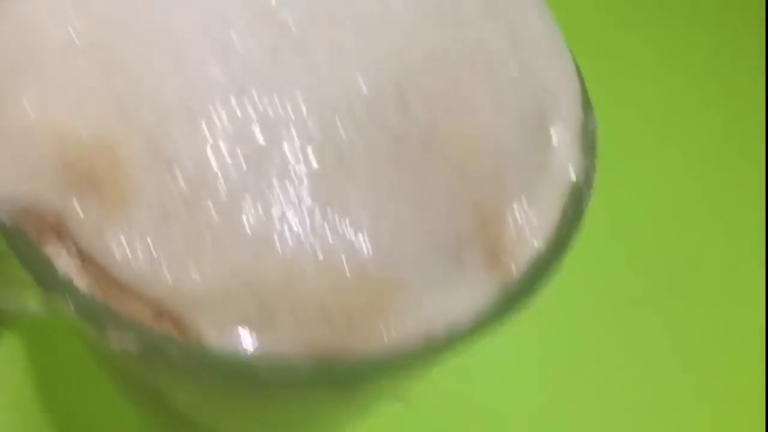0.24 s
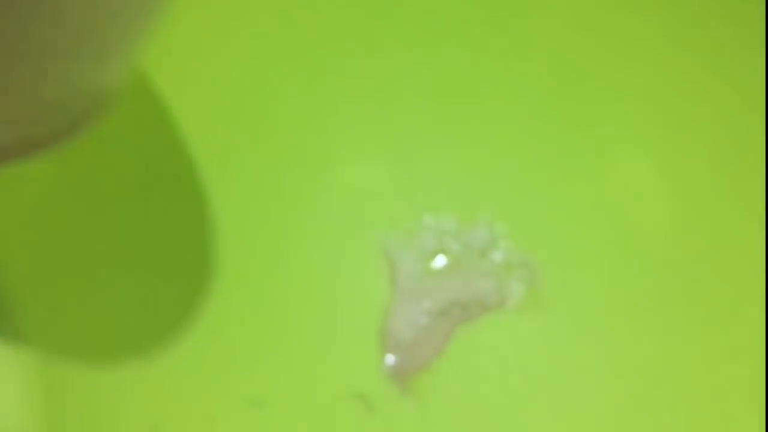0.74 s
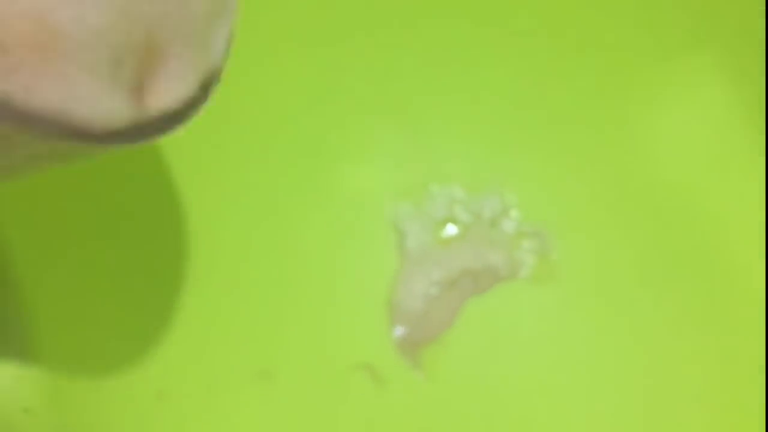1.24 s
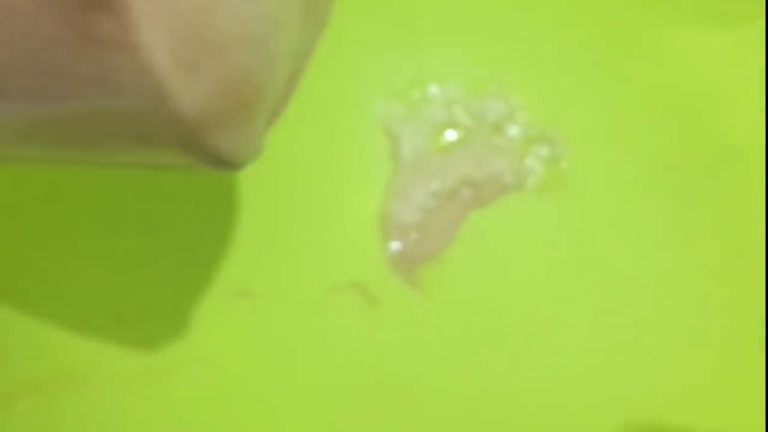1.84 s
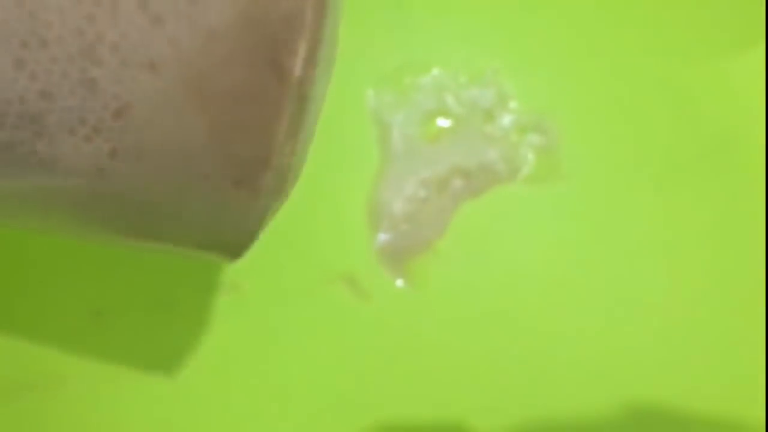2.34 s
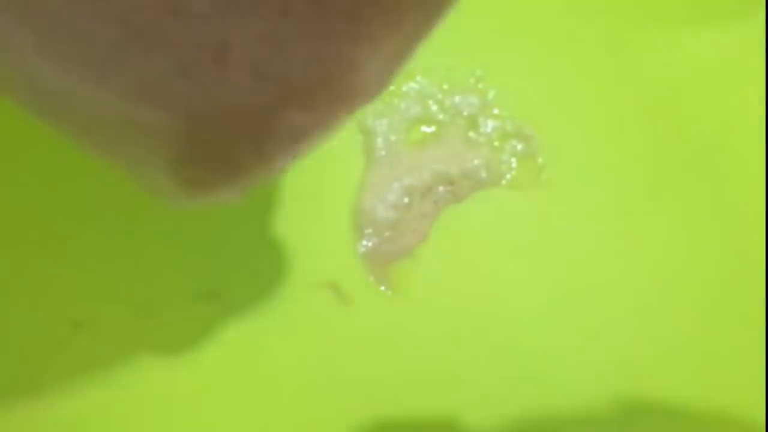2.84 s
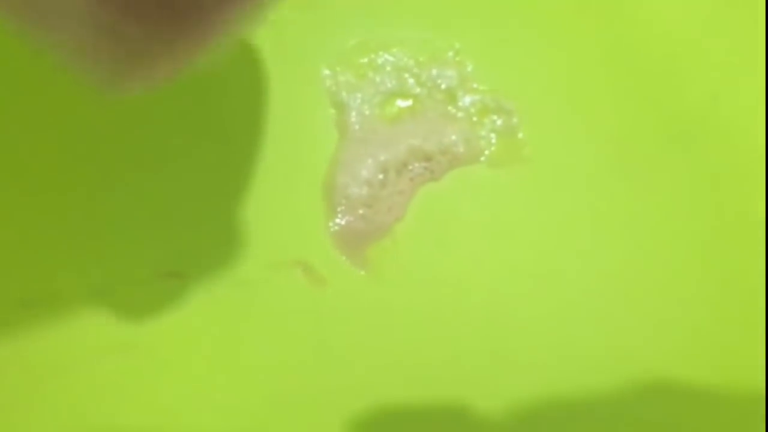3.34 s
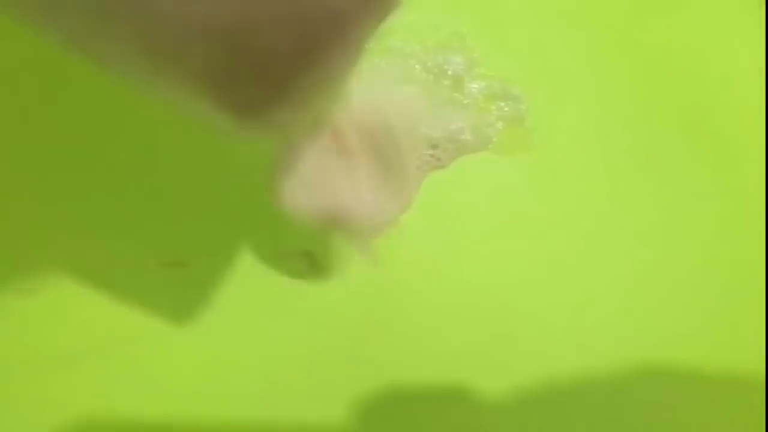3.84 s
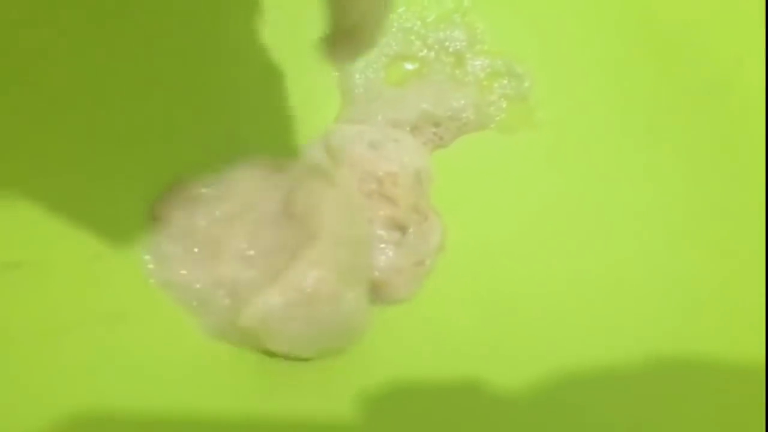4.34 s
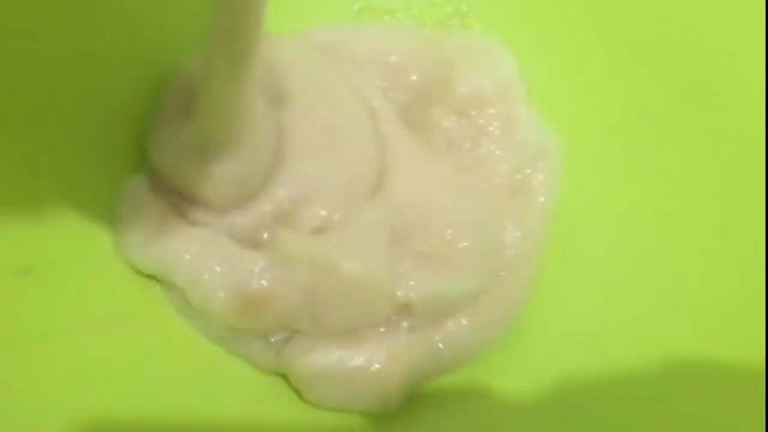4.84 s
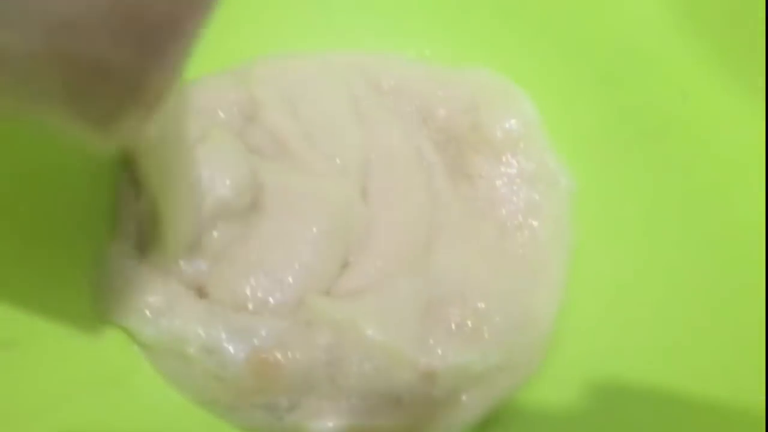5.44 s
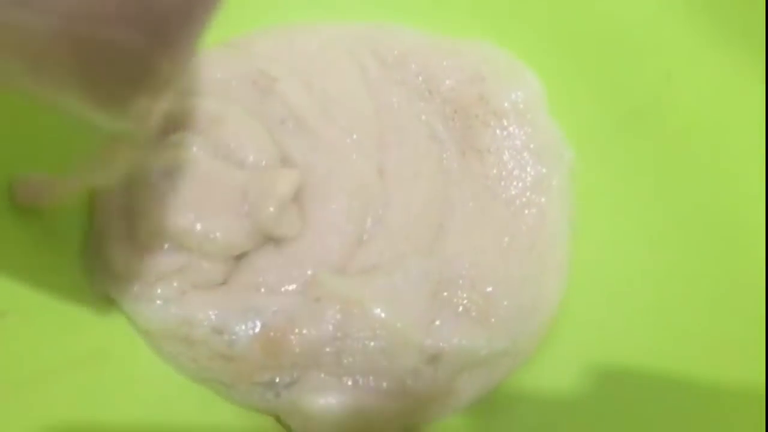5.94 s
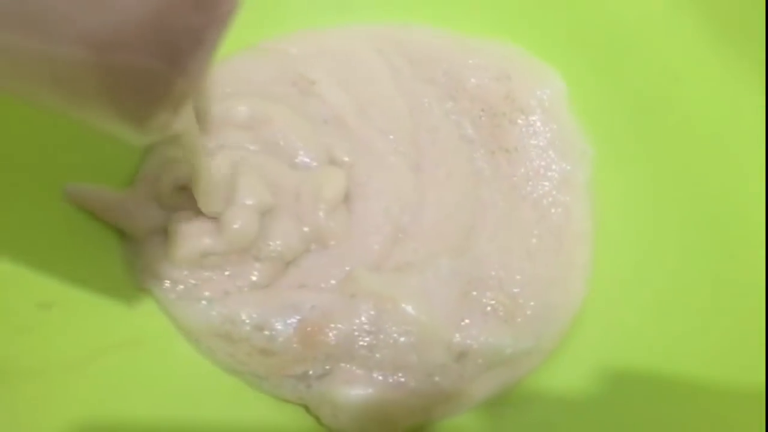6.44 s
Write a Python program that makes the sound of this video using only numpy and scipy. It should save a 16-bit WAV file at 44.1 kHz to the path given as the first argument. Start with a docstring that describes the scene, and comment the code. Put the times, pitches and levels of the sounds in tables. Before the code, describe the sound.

Over a low refrigerator hum, a glass knocks a plastic bowl, ticks in creaky slips, then thick frothy batter plops out wetly.

```python
"""A small kitchen, one microphone: a glass of frothy batter is knocked, tipped and emptied into a bowl.
Room rumble is shaped noise; a refrigerator motor hums in sines. The knock rings a plastic bowl and counter.
Slips tick along the glass as noise cracks and ringing modes, and fingers hiss on it.
Blobs splat in noise bursts, trapped air pops in short sines, and froth rustles in flickering noise bands."""
import sys
import numpy as np
from scipy import signal
from scipy.fft import rfft, irfft, next_fast_len
from scipy.io import wavfile
from scipy.ndimage import map_coordinates

SR = 44100
rng = np.random.default_rng(int(sys.argv[2]) if len(sys.argv) > 2 else 0)


def to_wav(sig):
    """Store sig (one row per channel, or 1-D mono) as 16-bit WAV at the path in sys.argv[1].

    Samples outside -1..1 are clipped; the rate is SR.
    """
    pcm = np.clip(np.atleast_2d(sig), -1, 1) * 32767
    pcm = np.round(pcm).astype(np.int16)
    wavfile.write(sys.argv[1], SR, pcm.T)  # frames by channels


def boost_factor(decibels):
    """Convert a level in decibels to a linear amplitude factor."""
    exponent = np.asarray(decibels, float) / 20
    return 10 ** exponent


N = 294357   # samples


def rms_one(x):
    """Scale to rms 1."""
    return x / np.sqrt(np.mean(x ** 2) + 1e-20)


def in_time(rows, outside=None):
    """Curve columns at every sample."""
    s, *columns = np.transpose(rows)
    return [np.interp(np.arange(N) / SR, s, c, outside, outside) for c in columns]


def drift(rate):
    """Smooth random curve of spread about 1, through `rate` random knots per second."""
    knots = rng.standard_normal(1000)
    return map_coordinates(knots, [np.arange(N) / SR * rate + 2], order=3)


def band(x, low_hz, high_hz):
    """Band-pass."""
    return signal.sosfilt(signal.butter(2, [low_hz, min(high_hz, .45 * SR)], "band", fs=SR, output="sos"), x)


def ring(clicks, hz, t60):
    """A unit click sets a sine of starting height 1 ringing; it falls 60 dB in t60 seconds."""
    r, w = boost_factor(-60 / (t60 * SR)), 2 * np.pi * hz / SR
    return signal.lfilter([0, np.sin(w)], [1, -2 * r * np.cos(w), r * r], clicks + 1e-18)


def resonance(x, hz, width_hz):
    """Two-pole resonance, gain 1 on top."""
    r = np.exp(-np.pi * width_hz / SR)
    poles = [1, -2 * r * np.cos(2 * np.pi * hz / SR), r * r]
    return signal.lfilter([(1 - r * r) / 2, 0, (r * r - 1) / 2], poles, x)


def clicks_at(seconds, db):
    """Impulses at the given times."""
    out = np.zeros(N)
    out[np.round(np.asarray(seconds) * SR).astype(int)] = boost_factor(np.asarray(db))
    return out


def half_octaves(grain_db):
    """Grainy noise in half-octave bands from 500 Hz up, and the centres of the bands."""
    grains = rng.standard_normal((2, N)) * boost_factor(grain_db * np.minimum(rng.exponential(1, N), 5))
    lows = 500 * np.sqrt(2) ** np.arange(10)
    bands = [rms_one(band(grains[k % 2], low, np.sqrt(2) * low)) for k, low in enumerate(lows)]
    return np.array(bands), lows * 2 ** .25


def blend(bands, db):
    """Bands weighted in dB, summed to about rms 1."""
    gain = boost_factor(db)
    return np.sum(bands * gain, axis=0) / np.sqrt(np.sum(gain ** 2, axis=0))


def rustle(grains, level_db, tilt_db, shared_db, patchy_db):
    """Fine grains in patches: all bands flicker together, and each swells on its own."""
    bands, hz = grains
    shared = drift(60.0)
    flicker_db = np.array([shared_db * shared + patchy_db * drift(28.0) for _ in hz])
    weight_db = np.log2(hz / 3000)[:, None] * np.clip(tilt_db, -9, 9)   # tilt in dB per octave
    return boost_factor(level_db) * blend(bands * boost_factor(flicker_db), weight_db)


# Room rumble and microphone hiss: (frequency [Hz], relative density [dB per Hz])
ROOM_SPECTRUM = [(22, -49), (36, -8.5), (45, -4.5), (110, -11.5), (180, -7.5), (260, -13.5), (400, -21.5),
                 (520, -30), (800, -32.5), (1000, -27.5), (1300, -34.5), (2500, -43), (5000, -48.5),
                 (7000, -51), (11500, -49.5)]
# Standing waves of the room: (frequency [Hz], width [Hz], lift [dB])
ROOM_MODES = [(69.3, 3.2, 13.5), (92.4, 33, 3.5), (149.4, 6.6, 8.5), (184, 2.7, 3.5), (235, 6.2, 8.5),
              (282, 8.5, 2)]


def room_tone():
    """Noise coloured by the rumble spectrum and the standing waves."""
    size = next_fast_len(N)
    hz = np.maximum(np.arange(size // 2 + 1) * SR / size, 1)
    table_hz, table_db = np.transpose(ROOM_SPECTRUM)
    db = np.interp(np.log(hz), np.log(table_hz), table_db)
    for centre_hz, width_hz, lift_db in ROOM_MODES:
        db += lift_db / (1 + (2 * (hz - centre_hz) / width_hz) ** 2)
    noise = irfft(rfft(rng.standard_normal(size)) * boost_factor(db), size)[:N]
    return boost_factor(-48) * rms_one(noise)


# Refrigerator motor tones: (multiple of the shaft rate, level before waver and swell [dB])
MOTOR_TONES = [(1, -65), (3, -62), (4, -50.5), (19, -78.5), (20, -77.5), (21, -85), (22, -74), (23, -79)]


def motor(buzz_db):
    """Steady multiples of the shaft rate; the high ones buzz in the casing and waver more."""
    shaft_hz = 47.65 * (1 + 0.00047 * drift(1.462))
    turn = 2 * np.pi * np.cumsum(shaft_hz) / SR
    out = np.zeros(N)
    for multiple, level_db in np.array(MOTOR_TONES):
        order = np.round(multiple)
        waver_db = 1.1 * drift(4.17) + (order > 10) * (buzz_db + 0.74 * drift(2.75))
        out += np.sqrt(2) * boost_factor(level_db + waver_db) * np.sin(order * turn + rng.uniform(0, 2 * np.pi))
    return out


# Short cracks, one of the knocked rim, the others wet batter:
# (time [s], level [dB], length [s], centre [Hz], fall-off [dB per octave])
SPLATS = [(1.423, -46, 0.0026, 4500, 23), (4.036, -30.5, 0.0097, 1660, 1.5), (4.051, -30, 0.002, 9500, 7),
          (4.386, -58, 0.0028, 3500, -1), (4.6197, -24, 0.0039, 4230, 6), (5.114, -41.5, 0.0028, 2600, 11),
          (5.12, -56, 0.025, 3950, 26), (5.296, -46, 0.0042, 1500, 7), (5.399, -50.5, .005, 1300, 8)]


def splats(grains):
    """Dense crackle that starts at once and dies; the spread froth keeps cracking faintly at random."""
    bands, hz = grains
    out = np.zeros(N)
    faint = [(rng.uniform(5.45, 6.6), -63, .004, 7000, 9) for _ in range(6)]   # columns of SPLATS
    for s, level_db, length, centre_hz, fall_db in SPLATS + faint:
        t = np.arange(round(4 * length * SR)) / SR
        shape = np.minimum(t / 0.0014, 1) * np.exp(-(t / length) ** 1.34)
        at = slice(round(s * SR), round(s * SR) + len(t))
        weight_db = -fall_db * abs(np.log2(hz / centre_hz))[:, None]
        out[at] += boost_factor(level_db) * shape * blend(bands[:, at], weight_db)
    return out


# Plastic bowl: (frequency [Hz], level [dB], t60 [s])
BOWL_MODES = [(1110, -20, 0.017), (1310, -4, 0.016), (1550, 4, 0.013), (1750, -14.5, 0.012),
              (2100, -2.5, 0.014), (2440, 8.5, 0.0082), (2930, 5.5, 0.016), (4400, -30, 0.018),
              (5700, -18, 0.011), (6560, -30, 0.017)]
# Counter under the bowl: (frequency [Hz], level [dB], t60 [s])
COUNTER_MODES = [(82, -22, 0.11), (137, -16.5, 0.075)]


def knock():
    """The rim ticks first, then the glass lands on the bowl in a soft contact; the counter booms below."""
    knock_s, knock_db = 1.4266, -11
    contact = np.hanning(round(0.0006 * SR) + 2)
    rim = clicks_at([knock_s - .0006], knock_db - 24)
    landing = np.convolve(clicks_at([knock_s], knock_db), contact / contact.sum())[:N]
    blow = rim - landing
    shell = sum(ring(blow, hz, t60) * boost_factor(level_db) for hz, level_db, t60 in BOWL_MODES)
    # a small shell radiates no bass
    shell = signal.sosfilt(signal.cheby2(6, 40, 800, "high", fs=SR, output="sos"), shell)
    return shell + sum(ring(blow, hz, t60) * boost_factor(level_db) for hz, level_db, t60 in COUNTER_MODES)


def kitchen(x):
    """Diffuse tail: dull noise that sets in after the first walls and dies away."""
    t60_s = 0.26
    t = np.arange(round(.4 * SR)) / SR
    onset = np.clip(t / 0.0058 - .5, 0, 1)
    tail = band(rng.standard_normal(len(t)), 210, 3900) * boost_factor(-60 * t / t60_s) * onset
    return signal.fftconvolve(x, tail / np.sqrt(np.sum(tail ** 2)))[:N]


# Modes of the glass, also rung by the ticks: (frequency [Hz], level [dB], t60 [s])
GLASS_MODES = [(2095, -4, .032), (2305, -3, .048), (3370, -12, .02), (4565, -7, .034), (5550, -9, .034),
               (6470, -8, .036), (7380, -6, .03), (8990, -14, .022), (9450, -12, .022), (10800, -13, .022)]
# Fingers shift on the glass: (middle [s], half length [s], hiss [dB],
# brightness, held within 9 either way [dB per octave], singing of the upper modes [dB])
STROKES = [(2.057, .12, -67.5, -2, -85), (2.17, 0.038, -66.5, 5, -68), (2.26, 0.07, -82, 3, -78),
           (2.433, 0.062, -66.5, 7, -73), (2.653, 0.093, -63, -2, -80), (2.826, 0.078, -63, -12, -72)]


def slide(grains):
    """Skin hisses on the glass and keeps two thin upper modes singing; each stroke swells and fades."""
    middle, half, hiss_db, tilt_db, sing_db = np.transpose(STROKES)[:, :, None]
    fade_db = 16   # loss at one half length from the middle
    shape = boost_factor(-fade_db * np.minimum(((np.arange(N) / SR - middle) / half) ** 2, 12))
    hiss = boost_factor(hiss_db) * shape
    mean_tilt_db = np.sum(hiss * tilt_db, axis=0) / hiss.sum(axis=0)
    skin = rustle(grains, 0, mean_tilt_db, shared_db=3.5, patchy_db=1.5)
    friction = rng.standard_normal(N) * boost_factor(5 * drift(50))   # in patches
    upper = GLASS_MODES[6], GLASS_MODES[9]
    sing = sum(ring(friction, hz, t60) * boost_factor(level_db) for hz, level_db, t60 in upper)
    return hiss.sum(axis=0) * skin + np.sum(boost_factor(sing_db) * shape, axis=0) * rms_one(sing)


# Pops of trapped air: (time [s], peak level [dB], frequency [Hz], length [cycles])
POPS = [(2.0474, -21, 483, 2.4), (4.04, -51, 650, 4.2), (4.178, -45.5, 557, 5.8), (4.622, -37.5, 610, 8.7),
        (4.6221, -29, 1010, 3.6), (5.112, -39.5, 1750, 4), (5.299, -39.5, 1037, 8.2),
        (5.399, -47, 600, 8.2)]
# Heavy blobs push the floor of the bowl: (time [s], peak level [dB])
THUMPS = [(4.53, -36), (5.112, -43), (5.298, -37), (5.4, -34.5)]


def pops():
    """A pocket of air swells and dies within a few cycles, rising a little in pitch; thumps are low pops."""
    out = np.zeros(N)
    thumps = [(s, db, 308, 1.2) for s, db in THUMPS]   # Hz, cycles
    for s, peak_db, hz, cycles in POPS + thumps:
        t = np.arange(round(3 * cycles / hz * SR)) / SR
        age = t * hz / cycles * 2.86
        swell = (age * np.exp(1 - age)) ** 2
        tone = np.sin(2 * np.pi * hz * t * (1 + 0.0062 * age))
        out[round(s * SR):][:len(t)] += boost_factor(peak_db) * swell * tone
    return out


# Single slips on the glass: (time [s], crack level [dB], thud level [dB],
# favoured upper mode [Hz], favoured low mode [Hz])
SLIPS = [(2.0903, -50, -44, 3400, 2230), (2.2, -51, -50, 3400, 2300), (2.3665, -58, -53, 4500, 2300),
         (2.57, -56, -37, 7400, 2300), (2.6805, -42.5, -31.5, 4600, 2300), (2.7058, -43, -31, 6440, 2100),
         (2.7388, -41, -30.5, 7540, 2300), (2.7755, -38, -34, 6600, 2100), (2.804, -35, -26.5, 5700, 2100),
         (2.8579, -32, -28.5, 7460, 2300), (2.9637, -30, -32.5, 7400, 2100),
         (2.9853, -34, -27.5, 6840, 2100), (2.99, -33.5, -28.5, 4530, 2100), (3.004, -55, -45, 7370, 2300),
         (3.249, -31, -28.5, 4500, 2100), (3.4324, -39.5, -28.5, 7400, 2100),
         (3.5112, -34, -32.5, 5600, 2300), (3.5869, -34, -33, 4600, 2100), (3.5977, -36.5, -38, 6240, 2300),
         (3.6144, -47, -32, 4520, 2300), (3.6898, -43, -40, 6300, 2300), (3.7069, -48.5, -37, 5560, 2300),
         (3.8043, -31, -31, 7400, 2300), (3.9911, -43, -34, 4500, 2300), (4.0964, -32.5, -36, 7400, 2300),
         (4.573, -43, -54, 4600, 2300)]


def slips():
    """The grip creeps in a fast run of small slips; single slips, before and after, each touch twice."""
    modes = np.array(GLASS_MODES)[:, 0]
    gaps_s = .0132 * 1.045 ** np.arange(6)   # the creak slows
    creak = []
    for k, s in enumerate(2.589 + np.cumsum(gaps_s) - gaps_s[0]):
        thud_db = -36 + 1.3 * k   # the jolts grow
        creak.append((s, -47.5 + rng.normal(), thud_db, rng.choice(modes[[3, 5]]), rng.choice(modes[:2])))
    rebounds = []   # the weak second touches
    for s, db, thud_db, *_ in SLIPS:
        again_s = s + .0105 * rng.uniform(.9, 1.1)
        again_db = db - 29 + 4 * rng.normal()
        rebounds.append((again_s, again_db, thud_db - 10.5, rng.choice(modes[3:7]), modes[1]))
    return np.transpose(creak + SLIPS + rebounds)


# Body of the microphone: (frequency [Hz], level [dB], t60 [s])
THUD_MODES = [(76, -1.5, 0.05), (135, 2.5, 0.027), (233, 0.5, 0.017), (507, -2, 0.0032)]


def ticks():
    """Each slip is a crack of a few ms that rings the glass and jolts the microphone."""
    s, crack_db, thud_db, high_hz, low_hz = slips()
    chance = rng.normal(0, 1, (len(s), len(GLASS_MODES)))
    # the glass rings more freely, by 2 dB per s, as it tips and the batter leaves the wall
    ring_db = -54.5 + 0.86 * (crack_db + 39) + 2 * (s - 3)
    tilt_db = 7 * np.log2(high_hz / 5600)   # dB per octave: a higher favoured mode rings brighter
    t = np.arange(round(.03 * SR)) / SR
    fade = 0.55 * np.minimum(t / 0.00062, 1) * boost_factor(-60 * t / 0.013)
    crack = np.convolve(clicks_at(s, crack_db), fade)[:N] * rms_one(band(rng.standard_normal(N), 480, 6900))
    rings = np.zeros(N)
    for k, (hz, level_db, t60) in enumerate(GLASS_MODES):
        # the spot that is hit favours two modes
        near = np.minimum(abs(np.log2(hz / low_hz)), abs(np.log2(hz / high_hz)))
        favour_db = 9.0 * np.exp(-(near / .09) ** 2)
        mode_db = ring_db + level_db + tilt_db * np.log2(hz / 4000) + favour_db + 2 * chance[:, k]
        rings += ring(clicks_at(s + 0.001055, mode_db), hz, t60)
    thud = np.zeros(N)
    for k, (hz, level_db, t60) in enumerate(THUD_MODES):
        thud += ring(clicks_at(s + 0.00174, thud_db + level_db), hz, t60) * (-1) ** k
    return crack + rings, thud


# Froth flowing into the bowl: (time [s], level [dB])
FLOW = [(3.82, -67), (3.9, -56), (4.0, -72), (4.14, -65), (4.2, -55), (4.26, -63.5), (4.4, -49.5),
        (4.43, -57), (4.46, -69), (4.49, -65), (4.52, -48), (4.6, -54.5), (4.79, -51), (4.85, -57.5),
        (4.96, -56), (5.1, -63.5), (5.33, -57.5), (5.42, -64.5), (5.6, -63.5), (6.3, -69)]
# Air in the bowl: (frequency [Hz], width [Hz], level [dB])
HOLLOW = [(600, 66, -1), (3500, 1100, -16), (6320, 330, -11.5)]


def flow(grains):
    """Bursting froth, coloured by the hollow of the bowl; larger pockets of air gurgle low."""
    level_db, = in_time(FLOW, outside=-120)
    # dB per octave; the thinning stream gets brighter
    tilt_db = -0.5 + 2.5 * (np.arange(N) / SR - FLOW[0][0])
    froth = rustle(grains, level_db, tilt_db, shared_db=1.0, patchy_db=1.4)
    gurgles_per_s, gurgle_db = 220, -5
    born = (rng.random(N) < gurgles_per_s / SR) * boost_factor(2.7 * rng.standard_normal(N))
    pitches_hz = np.geomspace(280, 800, 8)
    dealt = rng.integers(0, 8, N)   # which pitch each pocket takes
    gurgles = sum(ring(born * (dealt == k), hz, 3.0 / hz) for k, hz in enumerate(pitches_hz))
    gurgles = signal.lfilter([1, -1], [1, -.97], gurgles)   # no bass
    gurgles = signal.lfilter([1], [1, -.92], gurgles)   # soft onsets
    hollow = sum(boost_factor(db) * resonance(froth, hz, width_hz) for hz, width_hz, db in HOLLOW)
    return 0.45 * froth + hollow + boost_factor(level_db + gurgle_db) * rms_one(gurgles)


# Background of the kitchen: (time [s], gain of room and motor [dB], extra gain of the casing buzz [dB])
SWELL = [(0, 1, -19), (1.2, 1, -2.5), (1.6, 2, -1.5), (3.5, 2, 3), (5.0, 1.5, 3), (6.67, 1.5, 1.5)]


def scene():
    """All sources at one microphone; the kitchen answers the ticks, knock, pops and splats."""
    hum_db, buzz_db = in_time(SWELL)
    glass, thud = ticks()
    grains = half_octaves(grain_db=5.0)
    near = glass + knock() + pops() + splats(grains)
    reverberant = near + boost_factor(-27.5) * kitchen(near)
    background = boost_factor(hum_db) * (room_tone() + motor(buzz_db))
    return (reverberant + thud + slide(grains) + flow(grains) + background)[None]


def low_pass(x):
    """Removes everything above the highest recorded frequency."""
    return signal.sosfilt(signal.butter(12, 13100, fs=SR, output="sos"), x)


# Dip in the microphone's response: (frequency [Hz], width [Hz], level [dB])
MICROPHONE_DIP = (4890, 930, -4.5)


def record(dry):
    """The microphone dips near 5 kHz and cuts the deep bass; the top is cut steeply."""
    hz, width_hz, dip_db = MICROPHONE_DIP
    x = dry - (1 - boost_factor(dip_db)) * resonance(dry, hz, width_hz)
    x = signal.sosfilt(signal.butter(6, 38, "high", fs=SR, output="sos"), x)
    mix = signal.sosfilt(signal.cheby2(14, 60, 12730, fs=SR, output="sos"), x)   # 60 dB down from 12730 Hz
    return low_pass(mix)


dry = scene()
out = record(dry)
to_wav(out)
```